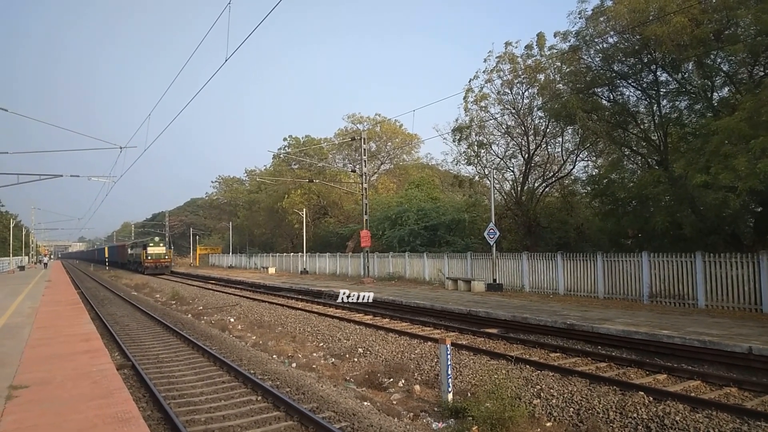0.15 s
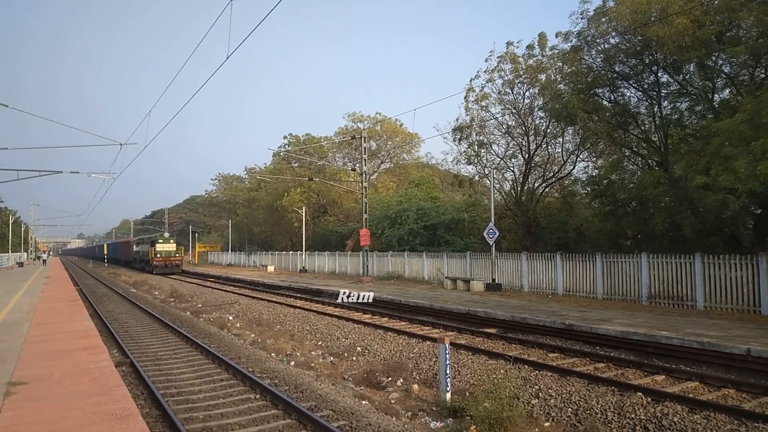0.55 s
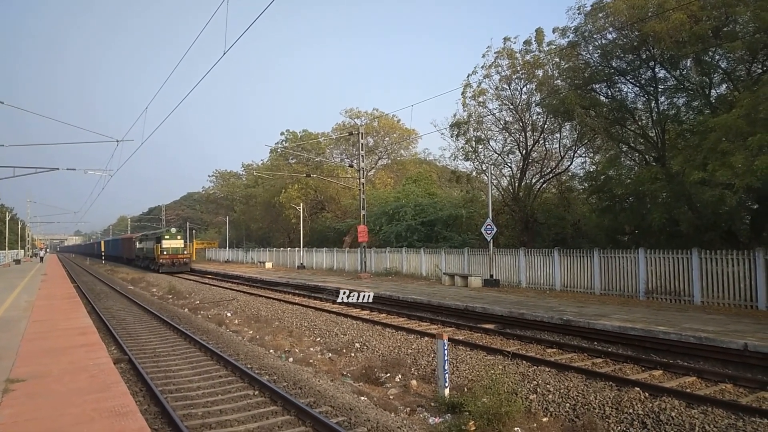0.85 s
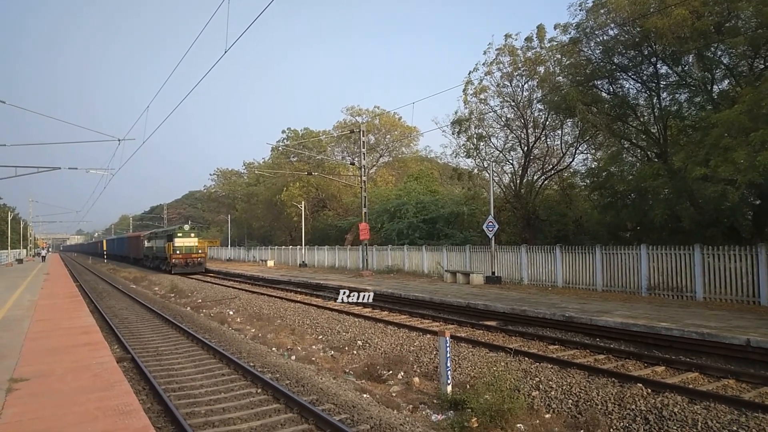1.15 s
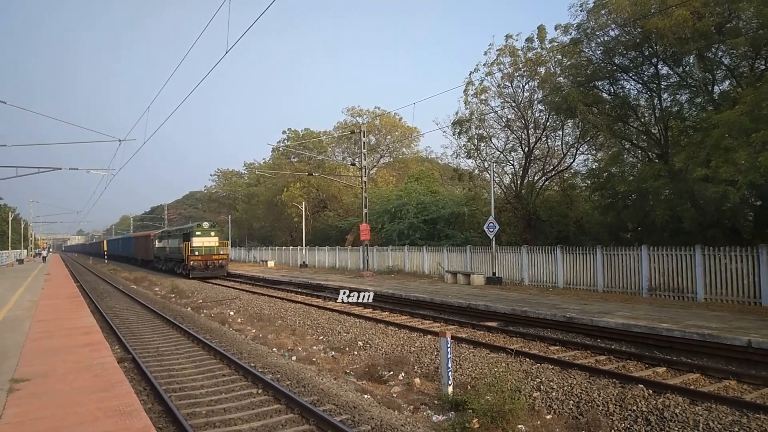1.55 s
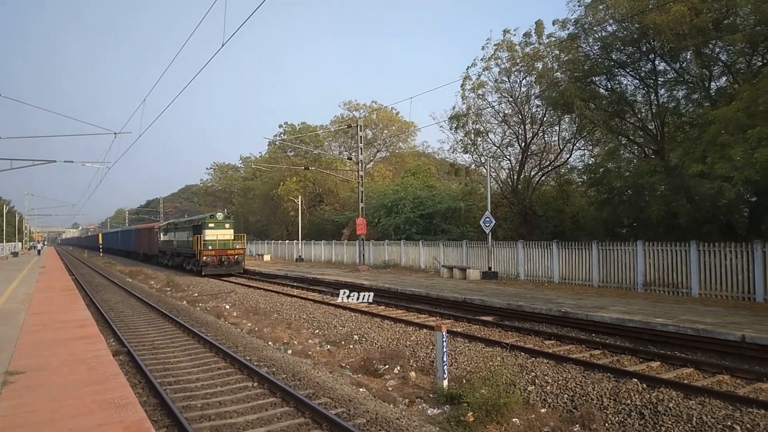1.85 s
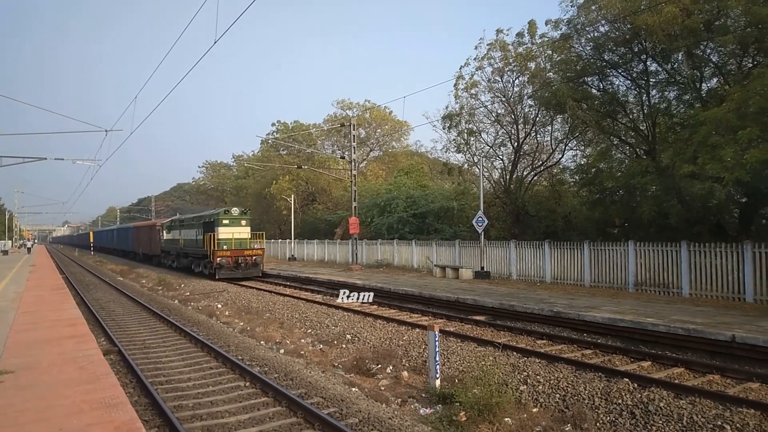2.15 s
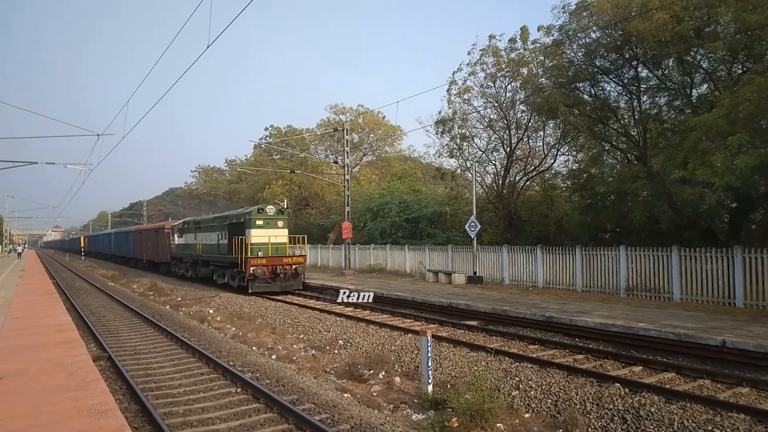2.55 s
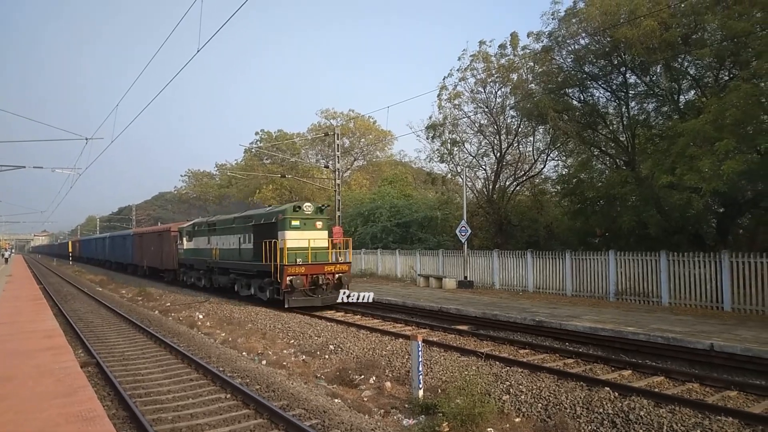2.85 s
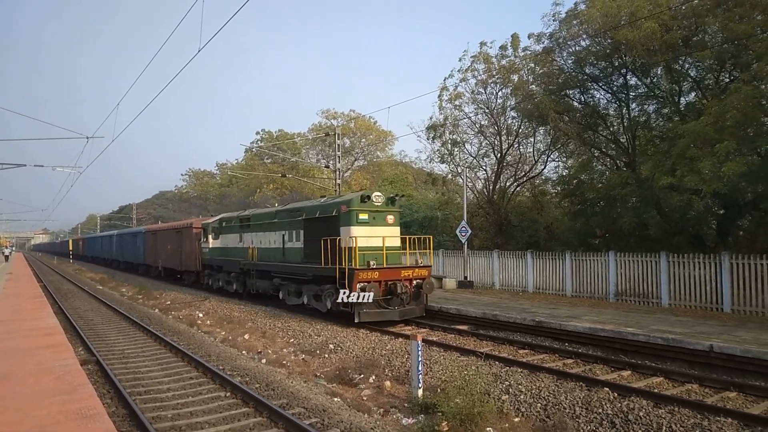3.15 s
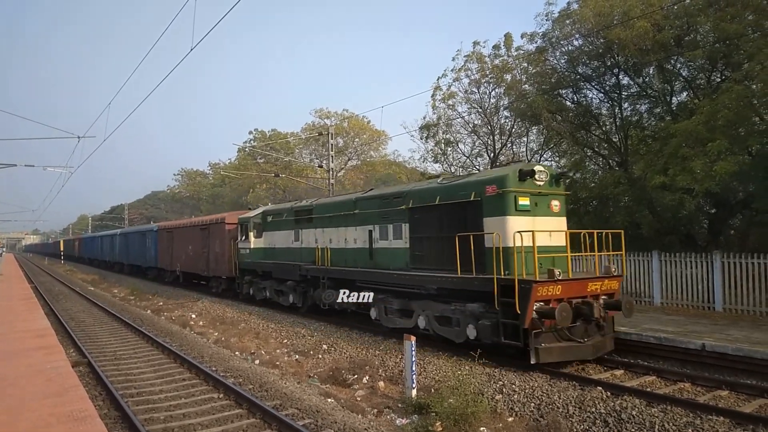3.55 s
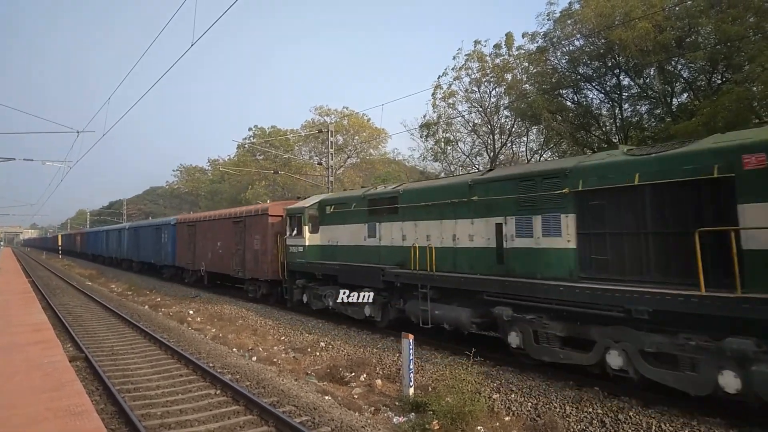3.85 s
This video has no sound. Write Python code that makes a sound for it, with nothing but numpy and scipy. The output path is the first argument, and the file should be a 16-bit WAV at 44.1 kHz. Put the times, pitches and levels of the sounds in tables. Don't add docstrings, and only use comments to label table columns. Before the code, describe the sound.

Deep pulsing diesel engine, distant at first, comes closer with heavy wagon rumble and broad rushing noise; thin metallic rail hiss flickers ahead, brightening near the end, captured outdoors by a stereo camera microphone beside the track.

```python
import sys
import numpy as np
from scipy import signal
from scipy.fft import rfft, irfft
from scipy.io import wavfile
from scipy.ndimage import uniform_filter1d

SR = 44100
rng = np.random.default_rng(int(sys.argv[2]) if len(sys.argv) > 2 else 0)


def boost(x):
    u = np.asarray(x, float) / 20
    return 10 ** u


def wav_out(sig):
    wavfile.write(sys.argv[1], SR, np.round(np.clip(np.atleast_2d(sig).T, -1, 1) * 32767).astype(np.int16))


N = 176400
LEFT_LAG_S = .00035


def evened(x):
    return x / np.sqrt(np.mean(np.abs(x) ** 2) + 1e-20)


def read_spectrum(points, hz):
    freq_hz, value = np.transpose(points)
    return np.interp(np.log(hz + 1), np.log(freq_hz + 1), value)


def curve(table, t, axis=1):
    rows = np.array(table)
    return np.interp(t, rows[:, 0], rows[:, axis])


def drift(seconds, shape):
    width = int(seconds * SR) + 1
    once = uniform_filter1d(rng.standard_normal(shape), width)
    return evened(uniform_filter1d(once, width))


def resonate(x, hz, width):
    turn = np.exp(2j * np.pi * hz * np.arange(x.shape[-1]) / SR)
    decay = np.exp(-np.pi * width / SR)
    return 2 * (turn * signal.lfilter([1 - decay], [1, -decay], x / turn)).real


# start_s, beat_db, bark_db
EXHAUST_LEVEL = [
    (0, -27, -30),
    (.6, -23.5, -28),
    (1.2, -19.5, -25),
    (1.8, -18.5, -24.5),
    (2.4, -15.5, -21),
    (3, -16, -23),
    (3.5, -16, -19.5),
    (4, -11, -13),
]
CYLINDER_LEVEL = [
    0,
    -2,
    -11,
    -11,
    -6,
    -9,
]
# pitch_hz, width_hz, level_db
PIPE_RESONANCES = [(70.4, 40, -5.5), (162.5, 16.2, 0.5), (189.8, 20, -4.5), (122.2, 10.3, -10.5),
                   (350, 32, -23)]
# multiple of firing rate, level_db
BEAT_OVERTONES = [(2, -11.5), (7 / 6, -20.5), (1.5, -14.5)]


def exhaust():
    loud_s, fire_hz, rise_hz_per_s = 1.098, 36.8, .93
    uneven_db, puff_db, beat_wobble_db = 1.2, -41, 1.6
    t = np.arange(N) / SR

    since_loud = t - loud_s
    firings = fire_hz * since_loud + rise_hz_per_s / 2 * np.maximum(since_loud, 0) ** 2

    lagged = firings - .1
    beat = np.cos(2 * np.pi * lagged)
    for multiple, db in BEAT_OVERTONES:
        beat = beat + boost(db) * np.cos(2 * np.pi * multiple * lagged)
    beat_db = curve(EXHAUST_LEVEL, t) + beat_wobble_db * drift(0.044, N)
    beat = -np.sqrt(2) * beat * boost(beat_db)

    index = np.floor(firings).astype(int)
    chance_db = uneven_db * rng.standard_normal(200)[index + 50]
    strength = boost(np.array(CYLINDER_LEVEL)[index % len(CYLINDER_LEVEL)] + chance_db)
    kicks = strength * (np.diff(index, prepend=index[0]) > 0)
    puffs = strength * np.exp(-(firings % 1) / 0.35) * rng.standard_normal(N)
    drive = kicks + boost(puff_db) * evened(puffs) * np.sqrt(np.mean(strength ** 2))

    bark = np.zeros(N)
    for hz, width, db in PIPE_RESONANCES:
        ringing = resonate(resonate(drive, hz, width), hz, 3 * width)
        bark += boost(db) * evened(ringing)
    return beat + evened(bark) * boost(curve(EXHAUST_LEVEL, t, axis=2))


# start_s, roar_db
APPROACH_LEVEL = [
    (0, -39.5),
    (.6, -36),
    (1.28, -34.5),
    (1.8, -30),
    (2.4, -27),
    (3, -22),
    (3.25, -19),
    (3.6, -17.5),
    (4, -14),
]
# freq_hz, level_db per hz
FAR_COLOUR = [(25, -1), (60, 27), (100, 5.5), (350, -2), (1300, -11), (3200, -15.5), (7000, -23.5),
              (14000, -37)]
# freq_hz, level_db per hz
NEAR_COLOUR = [(25, 6), (60, 3), (130, 8), (380, 2), (1300, -9.5), (3200, -13.5), (7000, -22.5),
               (14000, -30)]
# pitch_hz, width_hz, level_db
BODY_RESONANCES = [(509, 35.4, -6.5), (793, 99, 6.5), (971, 54, 4), (2090, 272, 6), (1730, 33, -5.5)]
# freq_hz, coherence (0-1)
COHERENCE = [(300, .99), (520, .78), (750, .92), (1100, .5), (2500, .4), (5000, .3), (13000, .25)]


def roar():
    far_db, near_db, patch_db, flicker_db, clatter_db = -51.5, -14.5, 1.05, 0.52, 1
    size, hop = 2048, 512
    frames, hz = N // hop + 5, np.fft.rfftfreq(size, 1 / SR)
    a, b, c, d, patches = rng.standard_normal((frames, len(hz), 5)).T
    patches = evened(uniform_filter1d(uniform_filter1d(patches, 14, 0), 5, 1))
    flicker = evened(uniform_filter1d(rng.standard_normal((frames, len(hz))), 200, 1).T)

    level_db = curve(APPROACH_LEVEL, np.arange(frames) * hop / SR)
    near = np.clip((level_db - far_db) / (near_db - far_db), 0, 1)
    body_db = sum(db * np.exp(-((hz - f) / w) ** 2 / 2) for f, w, db in BODY_RESONANCES)
    far_colour = read_spectrum(FAR_COLOUR, hz)[:, None]
    near_colour = read_spectrum(NEAR_COLOUR, hz)[:, None]
    colour_db = far_colour * (1 - near) + near_colour * near + body_db[:, None]

    same = np.clip(read_spectrum(COHERENCE, hz), 0, 1)[:, None]
    lag_s = LEFT_LAG_S * np.clip(hz / 3000, .3, 1)
    late = np.exp(-2j * np.pi * hz * lag_s)[:, None]
    right = a + 1j * b
    left = same * late * right + np.sqrt(1 - same ** 2) * (c + 1j * d)

    uneven_db = (patch_db + clatter_db * near ** 2) * patches + flicker_db * flicker
    gain = boost(colour_db + level_db - 13 + uneven_db) * (hz > 15)[:, None]
    spectra = np.array([left, right]) * gain
    return signal.istft(spectra, nperseg=size, noverlap=size - hop)[1][:, :N]


def add_rail_sound(mix, start, length, hz, width, db, same):
    attack_s, release_s, sag_db = .010, .07, -1.5
    flutter_db, flutter_s = 1.5, .015
    t = np.arange(0, length + 5 * release_s, 1 / SR)
    left, right = rng.standard_normal((2, len(t)))
    shared = np.roll(right, round(LEFT_LAG_S * SR))
    left = same * shared + np.sqrt(1 - same ** 2) * left
    noise = np.array([left, right])

    rise_s = min(attack_s * (1 + width / 900) * 9000 / hz, length / 3)
    attack = np.minimum(t / rise_s, 1)
    release = np.exp(-np.maximum(t - length, 0) / release_s)
    shape = attack * release * boost(sag_db * t / length)
    level = boost(db + 2.5 + flutter_db * drift(flutter_s, len(t)))
    sound = evened(resonate(resonate(noise, hz, width), hz, width)) * shape * level
    part = mix[:, round(max(start, 0) * SR):][:, :len(t)]
    part += sound[:, :part.shape[1]]


# pitch_hz, width_hz
MODES = [(5540, 110), (5760, 220), (7100, 45), (8660, 90), (8850, 200), (10190, 55), (10700, 90),
         (12475, 45), (12620, 90), (12900, 160), (13240, 170), (14250, 250)]
# start_s, length_s, level_db
MODE_SINGING = [
    [(.4, .17, -50), (1.76, .22, -45), (3.065, .07, -29)],
    [(3.07, .07, -29), (3.69, .09, -34)],
    [(.178, .29, -40), (1.712, .6, -39), (3.06, .2, -45)],
    [(.25, .25, -57), (3.03, .18, -38)],
    [(.9, .65, -60), (3.62, .06, -34)],
    [(0, .2, -58), (.178, 1.2, -53), (1.58, .72, -49), (2.13, .15, -46)],
    [(2.37, .15, -47)],
    [(1.2, .65, -53), (1.9, .8, -53), (2.8, .65, -47)],
    [(.25, .3, -57), (1.7, .1, -48)],
    [(2.6, .9, -47)],
    [(0, .17, -52), (.2, .3, -57), (.5, .62, -48), (1.35, .5, -43), (1.9, .8, -47), (2.75, .76, -41)],
    [(.2, .3, -52), (1.8, .2, -48)],
]
# start_s, length_s, pitch_hz, width_hz,
# level_db
RAIL_HISS = [(0, 0.79, 14700, 1500, -40.5), (.176, 0.43, 7290, 700, -43.5), (0.182, .45, 10300, 1600, -47),
             (0.242, 0.33, 8600, 600, -52.5), (.33, .28, 5900, 1300, -48), (0.71, .15, 9960, 1810, -45.5),
             (1.094, 1.2, 14900, 1800, -45), (1.421, 1.6, 12400, 1000, -49),
             (1.565, 1.41, 10130, 2000, -40.5), (1.744, 0.29, 6800, 1530, -39),
             (1.809, .015, 1370, 350, -33), (1.878, .06, 4150, 1400, -46), (2.027, 0.38, 6900, 1500, -42.5),
             (2.059, 0.46, 8900, 900, -46), (2.098, 0.26, 14700, 1200, -38),
             (2.751, 0.89, 12600, 900, -35.5), (3.028, 0.47, 10130, 2320, -28),
             (3.033, 0.25, 7700, 1220, -32.5), (3.052, .2, 5750, 1230, -29), (3.14, .12, 4100, 2000, -35),
             (3.558, .5, 10600, 1500, -34), (3.398, .6, 2160, 695, -30.5), (3.608, 0.21, 9200, 1200, -30.5),
             (3.68, 0.086, 6300, 1530, -33)]


def rails():
    out = np.zeros((2, N))
    for (hz, width), rows in zip(MODES, MODE_SINGING):
        for start, length, db in rows:
            add_rail_sound(out, start, length, hz, width, db, same=.65)
    for start, length, hz, width, db in RAIL_HISS:
        add_rail_sound(out, start, length, hz, width, db, same=.3)
    return out


def scene():
    right = exhaust()
    left = np.concatenate([np.zeros(10), right[:-10]])
    return np.array([left, right]) + roar() + rails()


def top_cut(x):
    return signal.sosfilt(signal.butter(12, 15600, fs=SR, output="sos"), x)


# freq_hz, left minus right level_db
PORT_LEAN = [(250, -1.3), (1500, 0), (2900, 5), (4200, 2), (6000, 8.5), (8600, -1), (10600, -25),
             (13000, 0)]


def record(dry):
    edge_hz, ceiling, knee = 13650, 1.04, 7.0
    padded = N + 4096
    hz = np.fft.rfftfreq(padded, 1 / SR)
    lean_db = read_spectrum(PORT_LEAN, hz)
    left_db = np.minimum(lean_db, lean_db / 2)
    right_db = -np.maximum(lean_db / 2, lean_db / 8)
    band_edge = .12 + 1 / np.sqrt(1 + (hz / edge_hz) ** 60)
    gain = boost(np.array([left_db, right_db])) * band_edge
    heard = irfft(rfft(dry, padded) * gain, padded)[:, :N]
    mix = heard / (1 + np.abs(heard / ceiling) ** knee) ** (1 / knee)
    return top_cut(mix)


dry = scene()
out = record(dry)
wav_out(out)
```